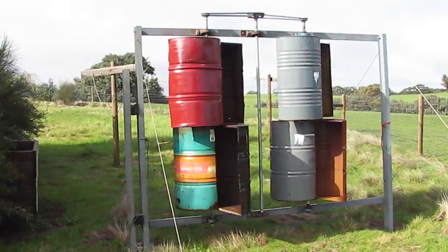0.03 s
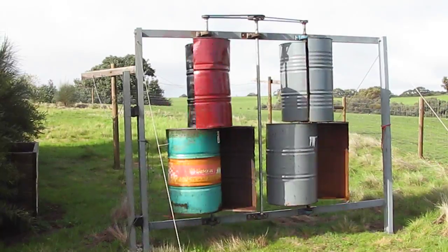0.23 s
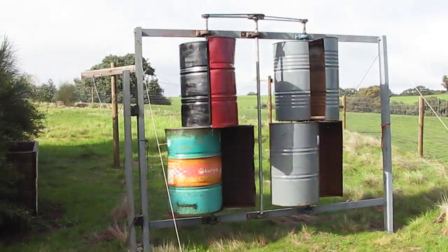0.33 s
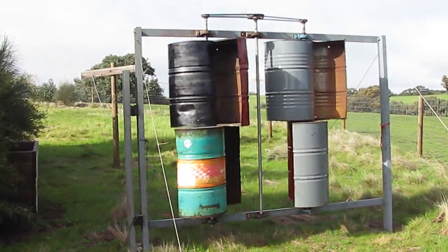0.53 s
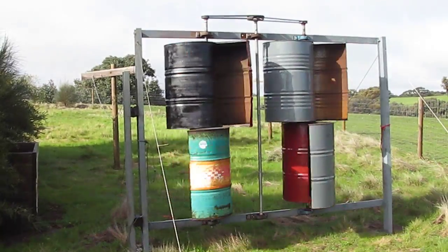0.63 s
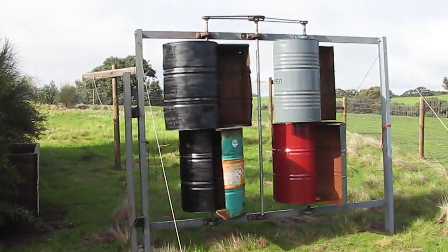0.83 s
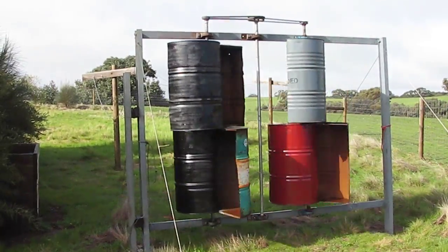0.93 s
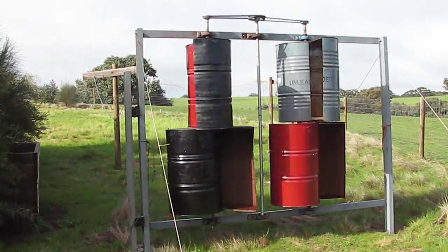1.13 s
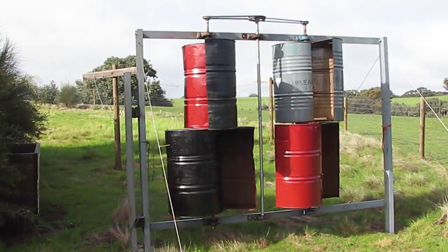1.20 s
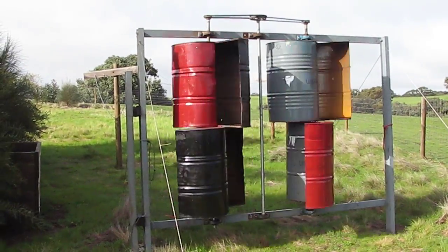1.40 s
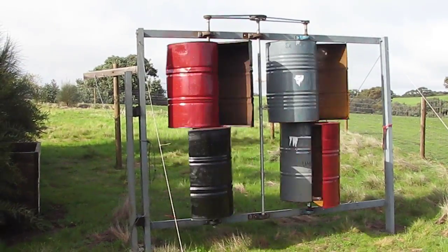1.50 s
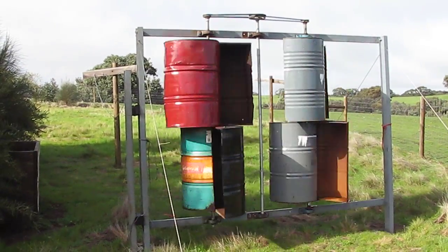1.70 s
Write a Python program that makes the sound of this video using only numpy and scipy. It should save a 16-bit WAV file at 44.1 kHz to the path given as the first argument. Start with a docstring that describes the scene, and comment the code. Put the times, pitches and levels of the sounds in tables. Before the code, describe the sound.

Wind buffets the microphone with a gusty low rumble while faint birds chirp outdoors.

```python
"""Wind buffets the two microphone ports of a camera in an open field. Grass and hedge hiss and rustle
as passing eddies build a slow rumble, a flutter and single thumps. From 0.3 s one hard gust tears and
clips; the gain control ducks, then creeps back. From 0.6 s a small bird chirps in gliding pure tones,
with a faint scuff beside it. From 1 s far birds whistle and call, echoing off the trees, while a softer
gust swells to its peak near 1.45 s and drops away."""
import sys
import numpy as np
from scipy import signal
from scipy.fft import rfft, irfft, next_fast_len
from scipy.io import wavfile
from scipy.ndimage import minimum_filter1d, map_coordinates

SR = 44100
rng = np.random.default_rng(int(sys.argv[2]) if len(sys.argv) > 2 else 0)


def to_wav(sig):
    """Store sig (one row per channel, or 1-D mono) as 16-bit WAV at the path in sys.argv[1].

    Samples outside -1..1 are clipped; the rate is SR.
    """
    pcm = np.clip(np.atleast_2d(sig), -1, 1) * 32767
    pcm = np.round(pcm).astype(np.int16)
    wavfile.write(sys.argv[1], SR, pcm.T)  # frames by channels


N = 77175

# colour of the grass and hedge bed (frequency [Hz], relative level [dB])
BED_COLOUR = [(40, -4.5), (250, 1), (420, -1.5), (650, -1.5), (900, -4), (1500, -11), (2400, -13.5),
              (4000, -18.5), (6500, -22.5), (7700, -41.5), (10500, -30), (13000, -37.5), (15500, -46.5)]
# fader ride of the bed (time [s], level [dB])
BED_RIDE = [(0, -52), (.3, -51), (.6, -53), (1.0, -50), (1.4, -49.5), (1.75, -50.5)]
# stereo image of the field (frequency [Hz], left-right correlation [0..1])
FIELD_IMAGE = [(100, 1), (1000, 0.93), (2500, .8), (6500, 0.36), (12000, .5)]
# high rustles (time [s], length [s], level [dB])
RUSTLES = [(0.078, 0.093, -59), (0.278, 0.11, -60)]
# colour of the rustles (frequency [Hz], relative level [dB])
RUSTLE_COLOUR = [(2500, -27.5), (4500, -7), (6000, -3.5), (6900, -5.5), (7800, -30.5), (12000, -29),
                 (15000, -36.5)]
# colour of a faint dry scuff (frequency [Hz], relative level [dB])
SCUFF_COLOUR = [(300, 14), (1400, 8.5), (2500, -8.5), (4000, -7.5), (6500, -12), (8000, -39.5)]
# far bird calls, one list per note (time [s], pitch [Hz], level [dB])
CALL_NOTES = [
    [(1.16, 1141, -65.5), (1.185, 1214, -54), (1.205, 1210, -66)],
    [(1.205, 1733, -67), (1.245, 1600, -65.5), (1.28, 1573, -57.5), (1.3, 1500, -67)],
    [(1.35, 1583, -64), (1.385, 1622, -57), (1.41, 1580, -68.5)],
]
# a far whistle, one list per note (time [s], pitch [Hz], level [dB])
WHISTLE_NOTES = [
    [(1.003, 1190, -66), (1.02, 1138, -51), (1.05, 1108, -49.5), (1.08, 1150, -52.5), (1.095, 1110, -86)],
]
# the small bird's chirps, one list per note (time [s], pitch [Hz], level [dB])
CHIRP_NOTES = [
    [(.612, 3030, -71), (.622, 3027, -48), (.628, 2850, -47), (.634, 2560, -42.5), (.64, 2170, -53)],
    [(.741, 4600, -58), (.749, 6160, -58), (.756, 5750, -44), (.767, 4797, -46.5), (.773, 3630, -49),
     (.781, 2894, -45.5), (.795, 2760, -44.5), (.803, 2590, -44.5), (.812, 2520, -54)],
    [(.87, 2810, -67.5), (.9, 2794, -59), (.94, 2784, -59.5), (.98, 2770, -70)],
]
# slapback echoes of the birds (delay [s], gain [dB])
SLAPBACKS = [(0.016, -9.5), (0.051, -21), (.115, -18)]
# wind at the ports (time [s], left rumble [dB], right rumble [dB], left flutter [dB], right flutter [dB])
WIND_RIDE = [(0, -90, -100, -106, -103), (.06, -31, -48.5, -44, -54), (.18, -28.5, -26.5, -65, -58.5),
             (.24, -15, -26, -20.5, -35.5), (.295, -24, -18.5, -21, -15.5), (.335, -5, -18.5, -6.5, -21),
             (.365, -3, -14.5, -8.5, -10), (.395, -11.5, -4.5, -2, -1), (.44, -17, -13.5, -26.5, -11.5),
             (.5, -10.5, -23, -10.5, -1.5), (.535, -17.5, -16.5, -21, -23.5), (.58, -13, -16, -22, -25),
             (.645, -26.5, -33.5, -46.5, -49), (.73, -22.5, -15, -22, -31), (.8, -15.5, -18.5, -37.5, -33),
             (.89, -21, -16.5, -38.5, -16.5), (.98, -22.5, -23, -45.5, -47), (1.08, -29, -33.5, -43, -45),
             (1.16, -31.5, -20.5, -38.5, -46), (1.25, -15, -28, -31, -31.5), (1.33, -13, -16.5, -26, -36),
             (1.39, -14.5, -19, -22, -31.5), (1.46, -6.5, -12, -25, -28.5), (1.505, -28, -23, -51, -41),
             (1.63, -40.5, -33.5, -43, -61), (1.69, -23, -23, -54, -43), (1.75, -29.5, -32, -52, -42)]
# single strong eddies (time [s], eddy frequency [Hz], left peak [dB], right peak [dB])
THUMP_HITS = [(0.228, 170, -12.5, -44), (0.3195, 145.8, 4, -25), (0.331, 61, -3, -31),
              (0.3524, 110, -3, -5.5), (.376, 413, -19, 2.5), (0.4212, 187, -15.5, 7.5),
              (0.546, 331, -29, -14.5), (0.581, 148.4, -11, -30), (.785, 90.1, -11, -26.5),
              (0.8836, 432, -50, -14), (0.89, 96, -39, -8), (0.948, 130, -36, -15.5), (1.1957, 97, -9, -23),
              (1.2896, 122.3, -3.5, -14.5), (1.382, 93.4, -8.5, -7), (1.441, 34.2, -15.5, -23.5),
              (1.456, 201, -19.5, -52), (1.582, 119, -47, -22.5)]
# fast eddies at a gust's crest (time [s], length [s], eddy frequency [Hz], left [dB], right [dB])
TEAR_BURSTS = [(0.3213, .003, 750, -21, -27), (.359, .012, 574, -1, -8), (0.37, 0.014, 586, -43, -6),
               (.388, 0.01, 468, -0.5, 0), (0.4, 0.031, 523, -26, -8), (0.423, 0.065, 452, -28.5, -15.5),
               (0.486, 0.022, 472, -22, -6), (0.502, 0.0096, 565, -27, -11.5),
               (0.514, 0.079, 247, -25, -32.5), (0.883, 0.011, 384, -47, -19), (0.9, 0.01, 325, -53.5, -27)]
# colour of the crackle on the tears (frequency [Hz], relative level [dB])
CRACKLE_COLOUR = [(1000, -5), (2800, 10.5), (4200, -13.5), (7000, -21.5), (15000, -25.5)]


def amp(db):
    """Decibels to gain."""
    return 10 ** (np.asarray(db) / 20)


def unit(x):
    """Scale to rms 1."""
    return x / np.sqrt(np.mean(x ** 2) + 1e-20)


def clock():
    """Time of every sample in seconds."""
    return np.arange(N) / SR


def along(points, hz):
    """Read (frequency, value) points on a log frequency axis."""
    freqs, values = np.transpose(points)
    return np.interp(np.log(hz + 1), np.log(freqs + 1), values)


def curves(rows):
    """One automation curve for each column after the time."""
    times, *columns = np.transpose(rows)
    return np.array([np.interp(clock(), times, column) for column in columns])


def wobble(rate):
    """A smooth random drift, rate knots a second."""
    return map_coordinates(rng.standard_normal(1024), [clock() * rate], mode="mirror")


def swell(start, length, attack, release):
    """A smooth rise, hold and fall; times in seconds."""
    t = clock() - start
    return (1 + np.tanh(t / attack)) * (1 + np.tanh((length - t) / release)) / 4


def filtered(x, response):
    """Zero-phase EQ; response gives the gain at each frequency."""
    size = next_fast_len(N + SR // 2)
    return irfft(rfft(x, size) * response(np.fft.rfftfreq(size, 1 / SR)), size)[..., :N]


def low_cut(x, hz):
    """Roll off the lows below hz; rms 1."""
    return unit(filtered(x, lambda f: f ** 2 / np.sqrt(f ** 4 + hz ** 4)))


def hiss(colour):
    """Coloured stereo noise from the field, centred in the bass and wide in the treble; rms 1."""
    def mid_side_eq(hz):
        width = np.arccos(np.clip(along(FIELD_IMAGE, hz), -1, 1)) / 2
        return amp(along(colour, hz)) * [np.cos(width), np.sin(width)]
    mid, side = filtered(rng.standard_normal((2, N)), mid_side_eq)
    return unit(np.array([mid + side, mid - side]))


def field():
    """The bed: hissing grass and hedge, with two high rustles and a dry scuff."""
    bed = amp(curves(BED_RIDE)[0] + .5 * wobble(12.16)) * hiss(BED_COLOUR)
    rustle_ride = sum(amp(db) * swell(start, length, 0.03, .02) for start, length, db in RUSTLES)
    rustles = rustle_ride * hiss(RUSTLE_COLOUR)
    scuff = amp(-38.5) * swell(start=.649, length=0.015, attack=0.0025, release=0.035) * hiss(SCUFF_COLOUR)
    fade_in = (1 + np.tanh((clock() - 0.036) / 0.001)) / 2
    return (bed + rustles + scuff) * fade_in


def bird(notes, echo_db, waver, pan_db, t60_s=.9):
    """Pure gliding notes with a wavering pitch; the trees scatter them into slapbacks and a tail."""
    voice, t = np.zeros(N), clock()
    for note in notes:
        hz, db = curves(note)
        start, end = note[0][0], note[-1][0]
        phase = 2 * np.pi * np.cumsum(hz * (1 + waver * wobble(250))) / SR
        voice += np.sqrt(2) * amp(db) * np.sin(phase) * swell(start, end - start, 0.0022, 0.0011)
    tail = rng.standard_normal((2, N)) * amp(-60 * t / t60_s)
    echo = signal.fftconvolve(voice[None], tail / np.linalg.norm(tail[0]), axes=1)[:, :N]
    slaps = sum(amp(db) * np.interp(t - delay, t, voice) for delay, db in SLAPBACKS)
    return voice * amp([[pan_db / 2], [-pan_db / 2]]) + slaps + amp(echo_db) * echo


def eddy(t, hz):
    """The push and pull of one eddy passing a port; smaller eddies sound higher. Peak 1."""
    angle = 2 * np.pi * hz * t
    return -angle * np.exp((1 - angle ** 2) / 2)


def eddies(centre_hz, spread, tilt_db, even_s):
    """Random eddies of nine sizes at each port, small ones tilted down, the flow levelled over even_s."""
    stream = np.zeros((2, N))
    for port in stream:
        for step in np.linspace(-2, 2, 9):
            hz = centre_hz * np.exp(spread * step)
            arrivals = (rng.random(N) < centre_hz / SR / 2) * rng.standard_normal(N)
            reach = int(SR / hz)
            pulse = unit(eddy(np.arange(-reach, reach + 1) / SR, hz))
            gain = amp(-tilt_db * step - step ** 2) * np.sqrt(hz)
            port += gain * signal.fftconvolve(arrivals, pulse, "same")
    window = np.hanning(max(int(2 * even_s * SR), 64))
    power = signal.fftconvolve(stream ** 2, window[None] / window.sum(), "same", axes=1)
    return stream / np.sqrt(np.abs(power) + np.mean(stream ** 2) / 20)


def buffeting():
    """The body of the wind: large slow eddies rumble and smaller ones flutter, differently at each port."""
    level_db = curves(WIND_RIDE)
    rumble = eddies(40, spread=0.38, tilt_db=.3, even_s=0.036)
    flutter = low_cut(eddies(140, spread=0.31, tilt_db=3.6, even_s=.018), hz=95)
    return amp(level_db[:2]) * rumble + amp(level_db[2:]) * flutter


def thumps():
    """The punch: single strong eddies hit the ports."""
    return sum(amp([[left_db], [right_db]]) * eddy(clock() - time, hz)
               for time, hz, left_db, right_db in THUMP_HITS)


def tearing(crackle_db=-28.5):
    """The edge: at its fastest the air breaks into small eddies that rip; their peaks spit crackles."""
    rip = np.zeros((2, N))
    for start, length, hz, left_db, right_db in TEAR_BURSTS:
        stream = low_cut(eddies(hz, spread=0.61, tilt_db=10.5, even_s=0.0076), hz=307)
        rip += amp([[left_db], [right_db]]) * swell(start, length, 0.0019, 0.0082) * stream
    grit = unit(filtered(rng.standard_normal((2, N)), lambda hz: amp(along(CRACKLE_COLOUR, hz))))
    return rip + amp(crackle_db) * grit * np.tanh(rip) ** 2


def scene():
    """The mix: field and birds behind, wind on the ports up front."""
    chirps = bird(CHIRP_NOTES, echo_db=-5, waver=.022, pan_db=4.0)
    whistle = bird(WHISTLE_NOTES, echo_db=-9.5, waver=0.0044, pan_db=0.5)
    calls = bird(CALL_NOTES, echo_db=-9, waver=0.0326, pan_db=2.0)
    return field() + chirps + whistle + calls + buffeting() + thumps() + tearing()


def trailing_mean(x, seconds):
    """Average over the preceding seconds."""
    width = int(seconds * SR) + 1
    return signal.fftconvolve(x, np.ones(width) / width)[:N]


def gain_control(x, threshold_db=-8, slope=3.34, max_duck_db=8.5,
                 lag_s=0.026, attack_s=0.025, hold_s=0.14, release_s=0.7):
    """A loud gust ducks the gain after a short lag; it holds, then creeps back."""
    power = trailing_mean(np.mean(x ** 2, axis=0), seconds=0.023)
    level_db = 10 * np.log10(np.abs(power) + 1e-12)
    target_db = np.clip(slope * (level_db - threshold_db), 0, max_duck_db)
    half_hold = int(hold_s * SR / 2)
    held_db = -minimum_filter1d(-target_db, 2 * half_hold + 1, origin=half_hold, mode="constant")
    decay = np.exp(-clock() / release_s)
    released_db = np.maximum.accumulate(held_db / decay) * decay
    duck_db = trailing_mean(released_db, attack_s)
    return x * amp(-np.interp(clock() - lag_s, clock(), duck_db))


def record(dry):
    """The camera's chain: gain control, rounded clipping at full scale and a brick-wall high cut."""
    knee, top_hz = 24, 15200
    ducked = gain_control(dry)
    clipped = ducked / (1 + np.abs(ducked) ** knee) ** (1 / knee)
    return filtered(clipped, lambda hz: hz < top_hz)


dry = scene()
out = record(dry)
to_wav(out)
```